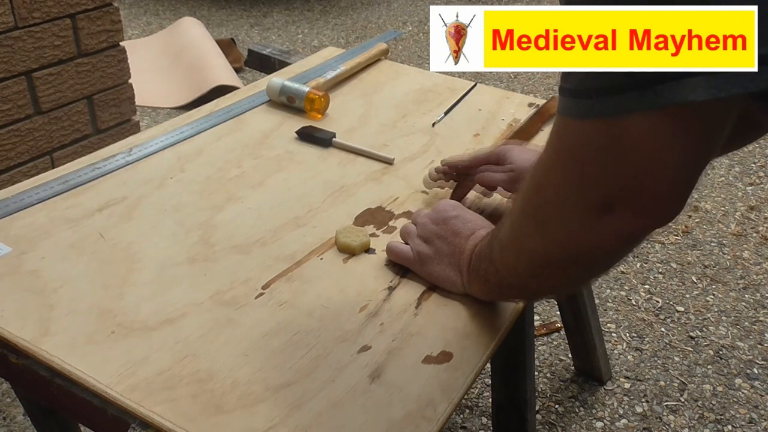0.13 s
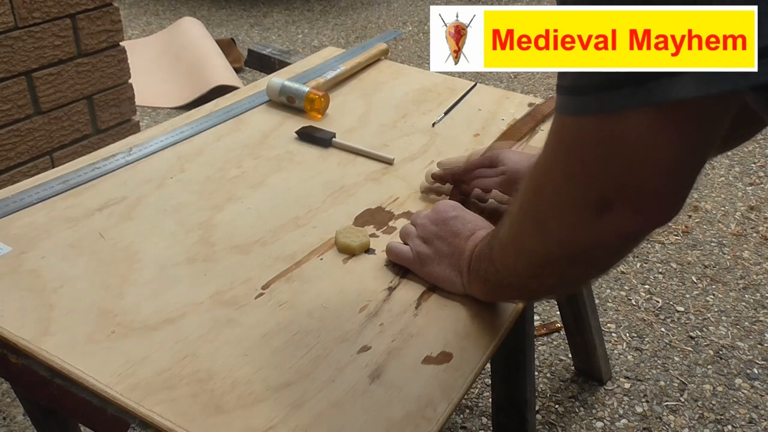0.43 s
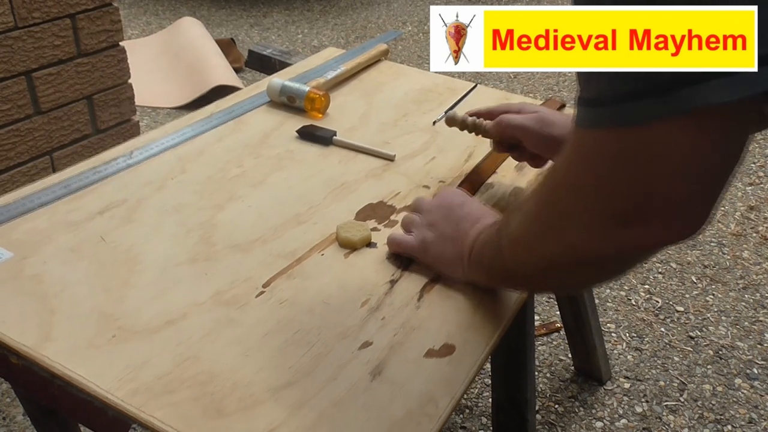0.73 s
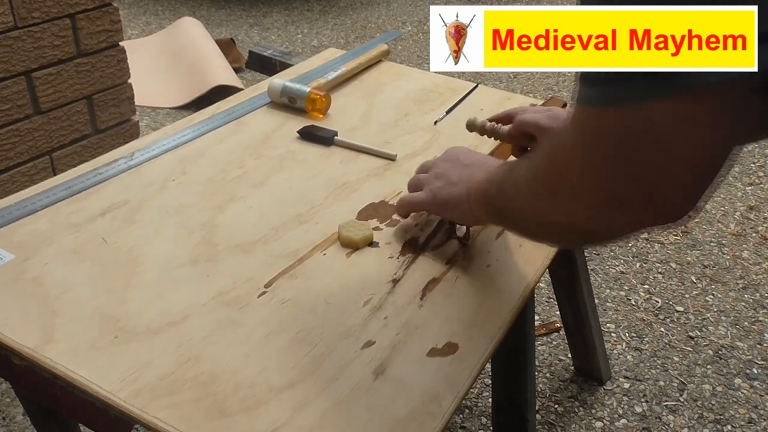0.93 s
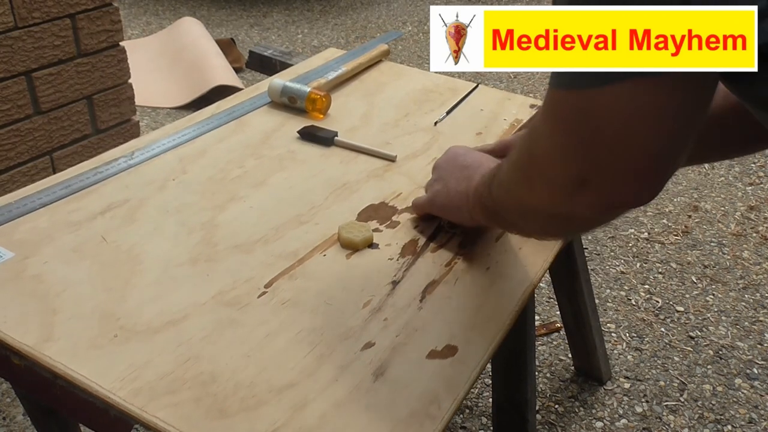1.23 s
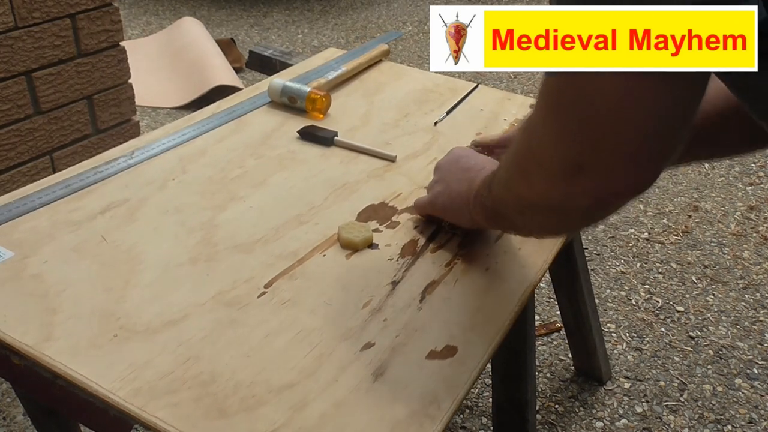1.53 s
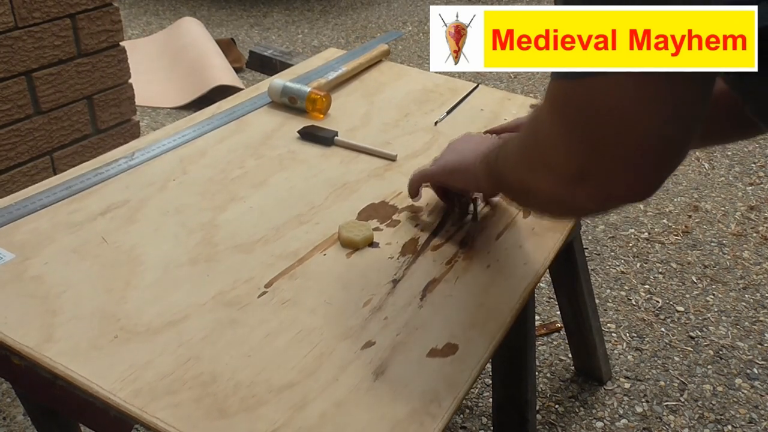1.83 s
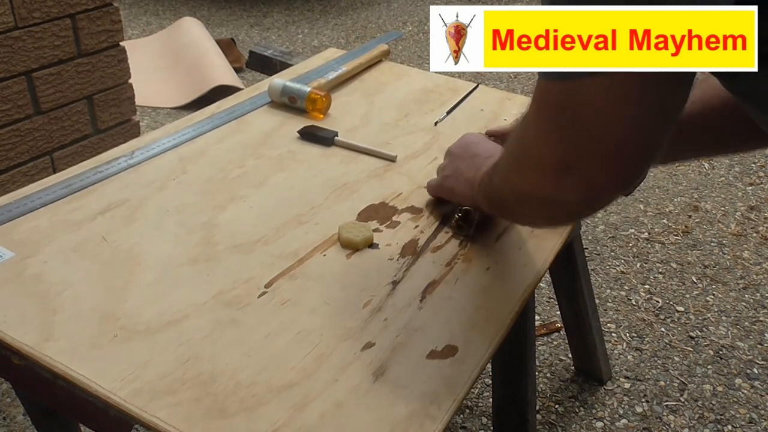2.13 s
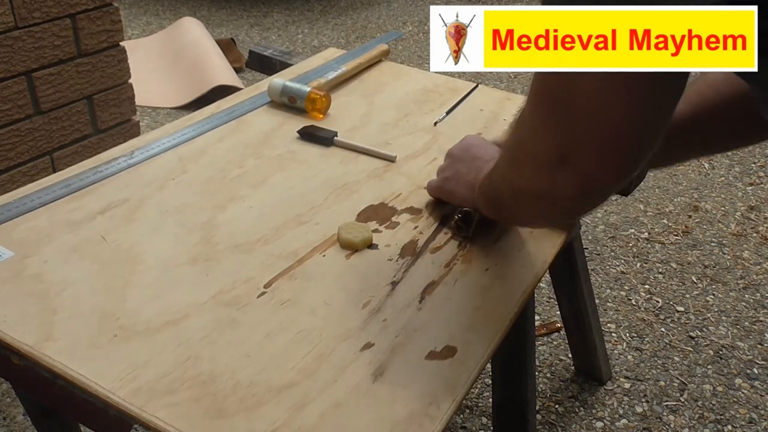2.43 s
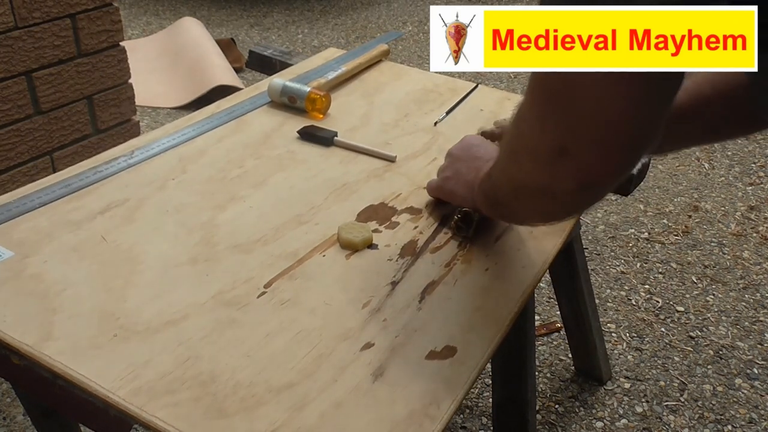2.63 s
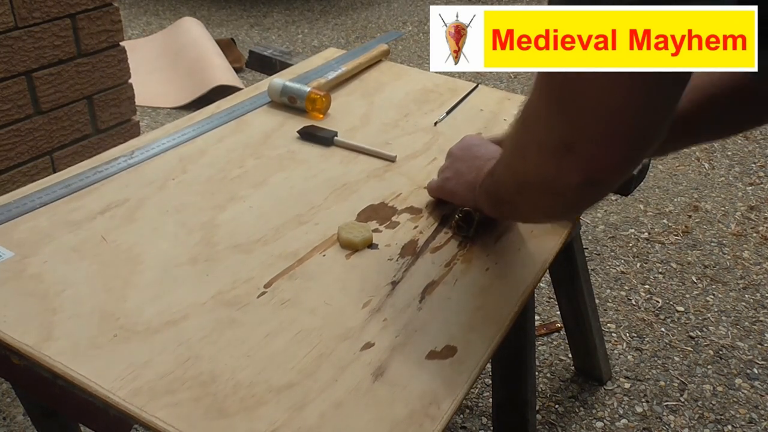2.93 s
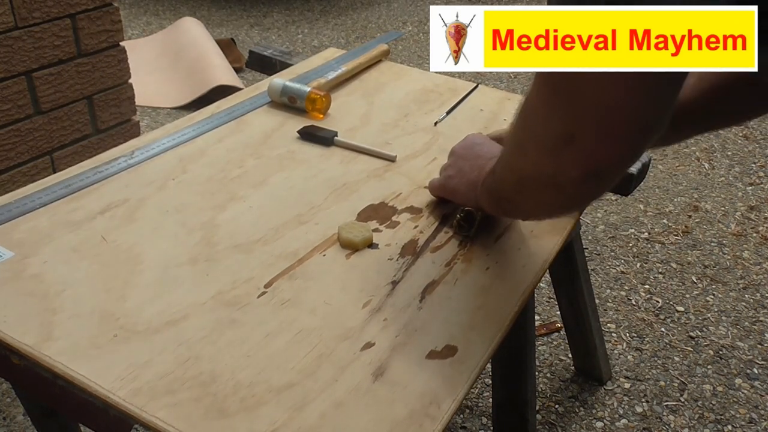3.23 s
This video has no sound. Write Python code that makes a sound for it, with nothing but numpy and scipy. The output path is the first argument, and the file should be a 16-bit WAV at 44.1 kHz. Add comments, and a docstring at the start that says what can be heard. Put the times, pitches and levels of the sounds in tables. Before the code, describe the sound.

A wooden burnisher rasps back and forth on waxed leather, pauses for strap shifting, bumps and faint clinks, rubs briefly, clacks hard, then rubs faster and louder; close stereo microphone outdoors, steady high hiss.

```python
"""Rasping back-and-forth strokes, bumps and one hard, clipped wooden clack, under a steady high hiss.
A wooden burnisher rubs a waxed leather edge on a plywood bench, outdoors; its stick-slip shakes the board.
A strap is shifted, hands and tool bump the bench, metal clinks and faint tones squeak.
Contacts are noise or impulses through coloured bench responses; clinks and squeaks are sines;
air and hiss (perhaps insects) are filtered noise."""
import sys
import numpy as np
from scipy import signal
from scipy.fft import rfft, irfft
from scipy.io import wavfile

SR = 44100
rng = np.random.default_rng(int(sys.argv[2]) if len(sys.argv) > 2 else 0)


def transcribe(u):
    """Save the signal u as a 16-bit wav file named by the first command-line argument.

    u: samples, shape (n,) or (channels, n), limited to [-1, 1]; the rate is SR.
    q: integer samples, one column per channel.
    """
    v = np.clip(np.atleast_2d(u).T, -1, 1)
    q = np.round(v * 32767).astype(np.int16)
    wavfile.write(sys.argv[1], SR, q)


N = 149940

# All levels and colours in dB are relative unless stated.
# Outdoor air spectrum. Each row: frequency in Hz, density in dB per Hz.
AIR_COLOUR = [(25, -34), (55, -19.5), (90, -5.5), (170, 0.5), (450, -5), (900, -12.5), (2000, -22),
              (3500, -30.5), (7000, -26), (11000, -38.5), (13700, -28.5), (16000, -50)]
# High hiss spectrum. Each row: frequency in Hz, density in dB per Hz.
HISS_COLOUR = [(5500, -35), (7200, -20.5), (8200, -4.5), (8950, 0.5), (9600, -3.5), (10400, -17.5),
               (11500, -26), (15000, -57)]
# Echo of wall and yard. Each row: frequency in Hz, 60 dB decay time in s.
YARD_DECAY = [(100, 0.083), (500, 0.33), (2000, 0.32), (6000, 0.23), (15000, 0.089)]
# Difference between the two capsules. Each row: frequency in Hz, side level in dB.
CAPSULE_SPLIT = [(100, -35), (300, -32), (600, -18), (2000, -16), (5000, -14), (12000, -10)]
# Plywood bench modes. Each row: frequency in Hz, initial level in dB, 60 dB decay time in s.
BENCH_MODES = [(209.4, 14.5, 0.12), (327, -1, 0.34), (401, -0.5, 0.43), (520.3, 6.5, 0.13),
               (623, -1.5, 0.14), (1071, 1.5, 0.17), (1106, -6, 0.21), (1354, 7, 0.1), (1378, -6, .12),
               (1540, -4, 0.17), (1618, -1, 0.051), (1702, -4, 0.12), (2070, 8, 0.13), (2240, 11, 0.091)]

# Short faint squeaks. Each row: middle in s, nominal pitch in Hz, level in dB.
SQUEAK_EVENTS = [(.96, 862, -35), (1.032, 867, -33), (1.105, 867, -31.5), (1.183, 834, -24),
                 (1.218, 867, -31), (1.295, 862, -28), (1.387, 890, -32.5), (1.533, 860, -24)]
# Light metal clinks, perhaps a buckle. Each row: start in s, level in dB.
CLINK_EVENTS = [(.904, -40), (.914, -31.5), (.924, -41), (.953, -32), (.96, -33), (.976, -39)]
# Modes of the metal. Each row: frequency in Hz, level in dB, 60 dB decay time in s.
METAL_MODES = [(3780, -12, 0.065), (5050, -4, 0.049), (6130, -3, 0.097), (7000, -4, 0.066),
               (11640, -5, .06), (12500, -9, .06), (13300, -11, 0.06), (15200, -16, 0.1)]

# Bumps on the bench. Each row: start in s, thud in dB, knock in dB, knock centre in Hz, tick in dB.
BUMP_EVENTS = [(.04, -20, -22.5, 910, -33), (.222, -25, -23.5, 905, -41), (0.4688, -18, -11, 840, -45),
               (0.554, -20, -9, 1330, -25), (.6755, -23, -12, 1200, -24), (.753, -17, -14, 750, -50),
               (0.771, -19, -15.5, 480, -50), (.833, -42, -33, 1300, -22), (0.8563, -16, -8, 620, -38),
               (.978, -38, -20, 1440, -15.5), (1.129, -16, -9.5, 650, -40), (1.1717, -30, -15, 1030, -18),
               (1.222, -11, -6.5, 583, -39), (1.253, -18.5, -26, 450, -48), (1.381, -18, -18.5, 1000, -34),
               (1.473, -20, -16, 706, -34), (1.526, -24, -25.5, 800, -38), (1.597, -5, -9, 614, -34),
               (1.608, -36, -17.5, 1170, -20), (1.904, -12, -5, 450, -15), (1.913, -13.5, -33, 400, -48),
               (1.929, -14.5, -29, 380, -50), (2.155, -20, -22, 680, -50), (2.12, -12.5, -15, 560, -48),
               (2.176, -28, -12.5, 650, -50), (2.254, -30, -23, 980, -20.5), (2.344, -33, -18.5, 970, -36),
               (2.988, -8.5, -25, 600, -38), (3.133, -20, -5, 610, -42), (3.184, -13.5, -30, 500, -44),
               (3.256, -2.5, -12, 745, -40)]
# Low thud of a blow. Each row: frequency in Hz, density in dB per Hz.
THUD_COLOUR = [(30, -40), (80, -11), (150, -14), (230, -5.5), (420, -7), (700, -25.5), (2000, -53)]
# Knock of a bump. Each row: multiple of its centre frequency, density in dB per Hz.
KNOCK_COLOUR = [(.15, -28), (.55, 0.5), (1, 8.5), (1.35, 0.5), (1.9, -6), (2.8, -13.5), (5, -31), (14, -78)]
# Sharp surface tick of a bump. Each row: frequency in Hz, density in dB per Hz.
TICK_COLOUR = [(500, -68), (1800, -10), (3000, 15), (5500, 14), (7800, 11.5), (11000, 3), (15500, -12)]
# Body of the clack. Each row: frequency in Hz, density in dB per Hz.
CLACK_COLOUR = [(25, -22), (90, -10), (150, -25.5), (300, -3), (520, -3.5), (620, 5), (760, 1), (1100, -1),
                (1400, -3.5), (2300, -10.5), (3000, -23.5), (6000, -33), (15000, -58)]
# First instant of the clack. Each row: frequency in Hz, density in dB per Hz.
CRACK_COLOUR = [(1000, -18), (2500, 7), (6000, 11.5), (9000, 0.5), (15500, -8)]

# Strap and hands sliding on the board.
# Each row: start in s, end in s, swish in dB, scrape in dB, board rumble in dB.
SLIDE_EVENTS = [(.546, 0.63, -18.5, -20.5, -28), (0.787, 0.854, -41.5, -32, -32),
                (0.88, 1.026, -36, -28.5, -27), (0.999, 1.12, -46, -41, -36.5),
                (1.193, 1.327, -39, -37, -26.5), (1.914, 2.026, -43, -63, -44),
                (2.073, 2.165, -41.5, -31.5, -34), (2.131, 2.21, -63, -34.5, -24.5),
                (2.199, 2.28, -68, -39, -32)]
# Tool strokes. Each row: start in s, end in s, rasp in dB, scrape in dB, board rumble in dB.
STROKE_EVENTS = [(0.037, 0.119, -37, -34.5, -28.5), (.122, 0.199, -32.5, -33, -27),
                 (0.219, 0.338, -37, -29.5, -24.5), (0.339, 0.433, -30, -30, -27.5),
                 (0.462, .548, -35.5, -27, -20), (0.651, 0.706, -39, -25, -27.5),
                 (1.108, 1.207, -34.5, -26, -27.5), (1.374, 1.493, -34, -27, -22.5),
                 (1.51, 1.632, -31.5, -24.5, -24.5), (1.635, 1.763, -34, -30, -23.5),
                 (2.272, 2.377, -31.5, -29, -22), (2.39, 2.501, -31, -26, -27.5),
                 (2.498, 2.594, -28.5, -24, -18.5), (2.604, 2.723, -31.5, -21.5, -20.5),
                 (2.731, 2.823, -29, -21, -17.5), (2.836, 2.963, -33.5, -20, -18),
                 (2.968, 3.069, -27.5, -20.5, -17), (3.089, 3.214, -31.5, -20, -16),
                 (3.218, 3.341, -28.5, -21, -16.5), (3.352, 3.473, -29, -27.5, -21.5)]
# Surface swish of a slide. Each row: frequency in Hz, density in dB per Hz.
SWISH_COLOUR = [(500, 3), (1300, 13), (2100, 5), (2900, -1.5), (4000, 4.5), (6000, 0.5), (8000, -6),
                (12500, -15.5), (15500, -29)]
# Surface rasp of a stroke. Each row: frequency in Hz, density in dB per Hz.
RASP_COLOUR = [(400, -51), (1200, 13.5), (2100, 5), (2900, -1), (3800, 4), (4800, 4), (6300, 0.5),
               (7800, -5.5), (11000, -14.5), (15500, -35)]
# Coarse scrape. Each row: frequency in Hz, density in dB per Hz.
SCRAPE_COLOUR = [(150, -48), (350, -2), (560, 3), (680, 3), (780, -6), (920, -5), (1030, -1.5), (1200, -12),
                 (1370, -10), (1700, -17), (2150, -13.5), (2650, -41), (5000, -12), (12000, -56)]
# Board rumble under a rub. Each row: frequency in Hz, density in dB per Hz.
RUMBLE_COLOUR = [(30, -41), (75, -27.5), (120, -10.5), (200, 2.5), (300, -4), (430, -5), (650, -32.5),
                 (1500, -50)]

AIR_MID_DB, AIR_SIDE_RATIO = -38, 0.49
HISS_MID_DB, HISS_SIDE_RATIO, HISS_PAN_DB = -39, 0.55, -1.2  # pan: left gain, negated on the right
YARD_DB = -18.5
EDGE_HZ = 15900  # top of the passed band

# Modes and dense ringing of the board, against the contact itself.
MODES_DB, SCATTER_DB, SCATTER_T60_S = -12, 3, 0.12
RUB_MODES_DB, RUB_SCATTER_DB = -29, -1.5  # a moving contact blurs the modes

SQUEAK_S, SQUEAK_WOBBLE, SQUEAK_WOBBLE_STEP_S = 0.032, 0.028, 0.0054  # wobble: fraction of pitch
CLINK_RATTLE_DB, CLINK_RATTLE_STEP_S = 4.5, 0.00155  # the loose metal buzzes as it rings
KNOCK_PEAK_S, KNOCK_CHATTER = 0.0036, 0.9
CLACK_S, CLACK_DB, CLACK_CRACK_DB, CLACK_THUD_DB = 2.013, 11, 3, -1.5

# Loudness grows as these powers of the speed; skew under 1 peaks early, over 1 late.
RASP_LAW, SCRAPE_LAW, RUMBLE_LAW = 0.7, 0.72, 0.73
RASP_SKEW, SCRAPE_SKEW, RUMBLE_SKEW = 0.76, 1.04, 1.05
SLIPS_PER_S, SLIP_SPREAD_DB, SLIP_SMOOTH = 600, 3.8, 0.36
GRAINS_PER_S, GRAIN_SPREAD_DB, GRAIN_SMOOTH = 9000, 2.5, 0.58
LUMP_STEP_S, LUMP_DB = 0.0102, 2.5  # the tool catches on lumps in the edge
TOOL_DECAY_S, TOOL_RING = 0.0052, 0.61  # brief ring of the tool, changing with the grip
STROKE_TRIM_DB, SLIDE_TRIM_DB = -2.5, -3.0


def amp(db):
    """Decibels to gain."""
    return 10 ** (np.asarray(db) / 20)


def unit(x):
    """Scales a signal to energy 1."""
    return x / np.sqrt(np.sum(x ** 2) + 1e-20)


def read(points, hz):
    """Interpolates a table on a log-frequency axis."""
    f, value = np.transpose(points)
    return np.interp(np.log(hz + 1), np.log(f + 1), value)


def add(mix, start_s, sound):
    """Mixes a sound in at a time, cut at the end of the mix."""
    part = mix[max(round(start_s * SR), 0):][:len(sound)]
    part += sound[:len(part)]


def through(x, response):
    """Passes a signal through a response, keeping its length."""
    return signal.fftconvolve(x, response)[:len(x)]


def wander(size, step_s):
    """Random curve: straight lines between normal draws one step apart."""
    position = np.arange(size) / SR / step_s + rng.random()
    return np.interp(position, np.arange(200), rng.standard_normal(200))


def colour(points, size=8192):
    """Causal minimum-phase response of energy 1 with the given spectrum."""
    log_gain = np.log(amp(read(points, abs(np.fft.fftfreq(size, 1 / SR)))))
    spectrum = np.exp(np.conj(signal.hilbert(log_gain)))
    return unit(np.fft.ifft(spectrum).real[:size // 2])


def steady(points, mid_db, side_ratio):
    """Steady stereo noise of one colour, from independent mid and side."""
    mid, side = (signal.fftconvolve(rng.standard_normal(N + SR), colour(points))[SR:SR + N]
                 for _ in range(2))
    return amp(mid_db) * np.array([mid + side_ratio * side, mid - side_ratio * side])


def outdoor_air():
    """Mostly low outdoor noise."""
    return steady(AIR_COLOUR, AIR_MID_DB, AIR_SIDE_RATIO)


def high_hiss():
    """Steady narrow hiss near 9 kHz, perhaps insects, stronger on the right."""
    return steady(HISS_COLOUR, HISS_MID_DB, HISS_SIDE_RATIO) * amp([[HISS_PAN_DB], [-HISS_PAN_DB]])


def yard(x):
    """Short faint echo: decaying noise, different in each ear, decay time set by frequency."""
    hz, t, z = signal.stft(rng.standard_normal((2, SR // 2)), SR, nperseg=256)
    decay = amp(-60 * t / read(YARD_DECAY, hz)[:, None])
    tails = signal.istft(z * decay, SR, nperseg=256)[1]
    return np.array([through(x, unit(tail)) for tail in tails])


def capsules(x):
    """Two close capsules hear nearly the same bass but a different treble."""
    side_gain = amp(read(CAPSULE_SPLIT, np.fft.rfftfreq(N, 1 / SR)))
    side = irfft(1j * rfft(x) * side_gain, N)
    return np.array([x + side, x - side])


def bench(modes_db, scatter_db, size=11000):
    """Response of the board at one spot: the contact, the main modes and a dense short ring."""
    t = np.arange(size) / SR
    modes = sum(amp(db - 60 * t / t60_s) * np.cos(2 * np.pi * hz * t) for hz, db, t60_s in BENCH_MODES)
    dense = rng.standard_normal(size) * amp(-60 * t / SCATTER_T60_S)
    dense *= 1 - np.exp(-t / 0.001)  # 1 ms build-up
    return (t == 0) + amp(modes_db) * unit(modes) + amp(scatter_db) * unit(dense)


def ring(points, modes_db=MODES_DB, scatter_db=SCATTER_DB):
    """The bench excited with a given colour, energy 1."""
    return unit(through(bench(modes_db, scatter_db), colour(points)))


def squeaks():
    """Short, nearly pure tones that swell and fade, with wobbling pitch."""
    out, size = np.zeros(N), round(SQUEAK_S * SR)
    for middle_s, hz, db in SQUEAK_EVENTS:
        pitch_hz = hz * (1 + SQUEAK_WOBBLE * wander(size, SQUEAK_WOBBLE_STEP_S))
        tone = np.sin(2 * np.pi * np.cumsum(pitch_hz) / SR)
        add(out, middle_s - SQUEAK_S / 2, amp(db) * np.hanning(size) * tone)
    return out


def clinks():
    """Small metal rings in decaying modes, each touch favouring other modes."""
    out, t = np.zeros(N), np.arange(SR // 5) / SR
    for start_s, level_db in CLINK_EVENTS:
        for hz, db, t60_s in METAL_MODES:
            rattle_db = CLINK_RATTLE_DB * wander(len(t), CLINK_RATTLE_STEP_S)
            envelope = amp(level_db + rattle_db + db - 60 * t / t60_s)
            add(out, start_s, rng.normal() * envelope * np.sin(2 * np.pi * hz * t))
    return out


def knock(centre_hz):
    """A padded contact chatters briefly; harder contacts sound higher."""
    t = np.arange(SR // 20) / SR
    burst = rng.standard_normal(len(t)) * t * np.exp(-t / KNOCK_PEAK_S)
    chatter = (t == 0) + KNOCK_CHATTER * unit(burst)
    points = [(multiple * centre_hz, db) for multiple, db in KNOCK_COLOUR]
    return unit(through(ring(points, modes_db=-14, scatter_db=-4), chatter))


def bumps():
    """Each bump rings the bench with a thud, a knock and a sharp surface tick."""
    out = np.zeros(N)
    for start_s, thud_db, knock_db, centre_hz, tick_db in BUMP_EVENTS:
        thud = 7 * amp(thud_db) * ring(THUD_COLOUR, modes_db=-17.5)
        body = 6 * amp(knock_db) * knock(centre_hz)
        tick = 3 * amp(tick_db) * ring(TICK_COLOUR)
        add(out, start_s, thud + body + tick)
    return out


def clack():
    """One hard wooden blow: thud, body and a bright crack, all through the bench."""
    out = np.zeros(N)
    thud = 8 * amp(CLACK_THUD_DB) * ring(THUD_COLOUR)
    body = 11 * amp(CLACK_DB) * ring(CLACK_COLOUR, modes_db=-15.5, scatter_db=-5.5)
    crack = 4 * amp(CLACK_CRACK_DB) * ring(CRACK_COLOUR, modes_db=-32, scatter_db=-5.5)
    add(out, CLACK_S, thud + body + crack)
    return out


def slips(size, per_s, spread_db, smooth):
    """Tiny random slips of uneven strength over smooth friction; rms 1."""
    strength = amp(spread_db * np.minimum(rng.exponential(1, size), 4))
    kicks = (rng.random(size) < per_s / SR) * rng.choice([-1, 1], size) * strength
    friction = unit(rng.standard_normal(size))
    return unit(unit(kicks) + smooth * friction) * np.sqrt(size)


def tool_ring():
    """The contact plus a brief noisy ring, drawn anew for each pass."""
    t = np.arange(SR // 10) / SR
    return (t == 0) + TOOL_RING * unit(rng.standard_normal(len(t)) * np.exp(-t / TOOL_DECAY_S))


def rub(start_s, end_s, top_db, scrape_db, rumble_db, top_colour):
    """One pass: speed rises and falls, driving surface rasp, coarse scrape and the board's rumble."""
    size = round((end_s - start_s) * SR)
    u, out = np.linspace(0, 1, size), np.zeros(size + SR // 2)
    grains = slips(SR // 2, GRAINS_PER_S, GRAIN_SPREAD_DB, GRAIN_SMOOTH)[:size]
    coarse = slips(SR // 2, SLIPS_PER_S, SLIP_SPREAD_DB, SLIP_SMOOTH)[:size]
    coarse = coarse * amp(LUMP_DB * wander(size, LUMP_STEP_S))
    top = through(tool_ring(), colour(top_colour))
    scrape = ring(SCRAPE_COLOUR, RUB_MODES_DB, RUB_SCATTER_DB)
    rumble = ring(RUMBLE_COLOUR, RUB_MODES_DB, RUB_SCATTER_DB)
    for drive, db, law, skew, response in [(grains, top_db, RASP_LAW, RASP_SKEW, top),
                                           (coarse, scrape_db, SCRAPE_LAW, SCRAPE_SKEW, scrape),
                                           (coarse, rumble_db, RUMBLE_LAW, RUMBLE_SKEW, rumble)]:
        force = abs(np.sin(np.pi * u ** skew)) ** law
        layer = unit(signal.fftconvolve(drive * force, response))
        add(out, 0, amp(db) * np.linalg.norm(force) * layer)
    return out


def slides():
    """Strap and hands slide over the board, with a swish on top."""
    out = np.zeros(N)
    for row in SLIDE_EVENTS:
        add(out, row[0], amp(SLIDE_TRIM_DB) * rub(*row, SWISH_COLOUR))
    return out


def strokes():
    """The tool rubs the waxed edge, with a rasp on top."""
    out = np.zeros(N)
    for row in STROKE_EVENTS:
        add(out, row[0], amp(STROKE_TRIM_DB) * rub(*row, RASP_COLOUR))
    return out


def scene():
    """Work at the bench, its echo, outdoor air and the high hiss."""
    background = outdoor_air() + high_hiss()
    work = squeaks() + clinks() + bumps() + clack() + slides() + strokes()
    return background + amp(YARD_DB) * yard(work) + capsules(work)


def record(dry):
    """Clips at full scale, then limits the band with a linear-phase low-pass."""
    clipped = np.clip(dry, -1, 1)
    low_pass = signal.firwin(301, EDGE_HZ, window=("kaiser", 8), fs=SR)
    return signal.oaconvolve(clipped, low_pass[None], "same")


dry = scene()
out = record(dry)
transcribe(out)
```